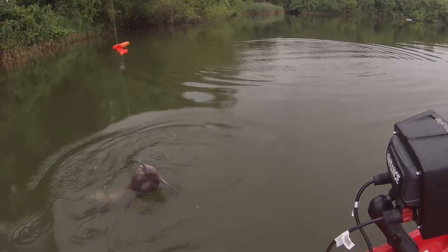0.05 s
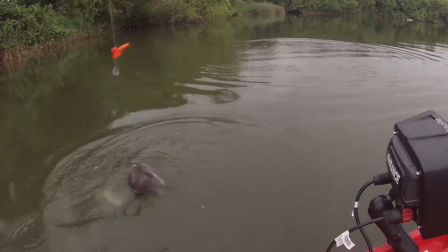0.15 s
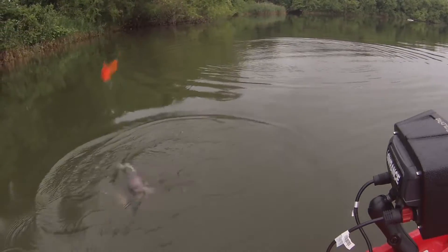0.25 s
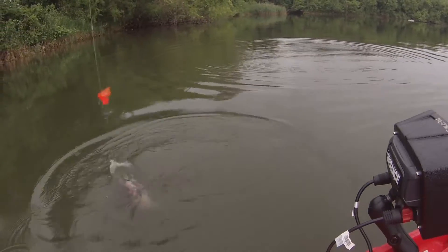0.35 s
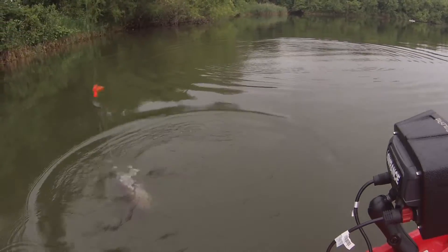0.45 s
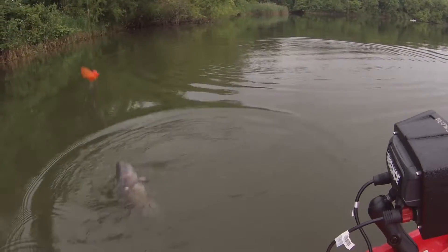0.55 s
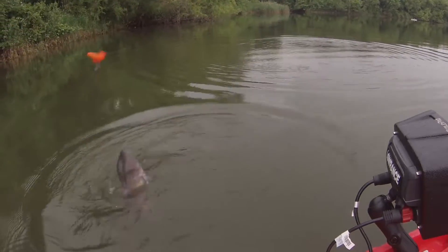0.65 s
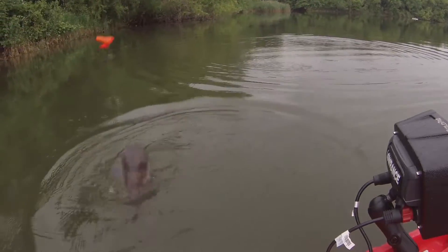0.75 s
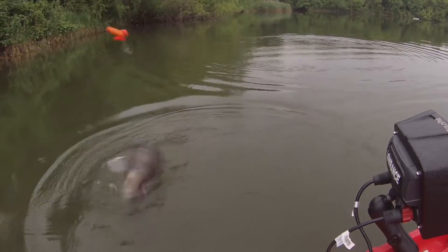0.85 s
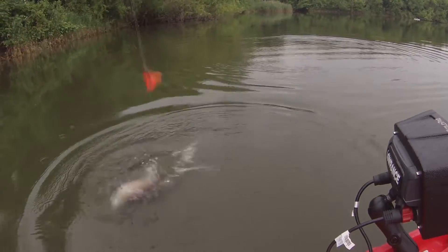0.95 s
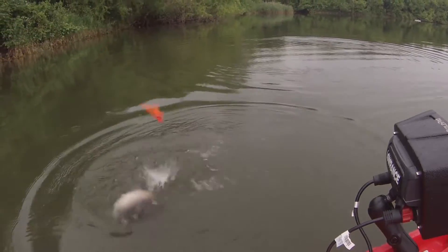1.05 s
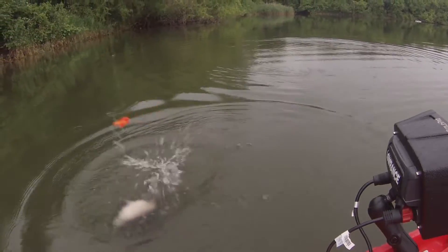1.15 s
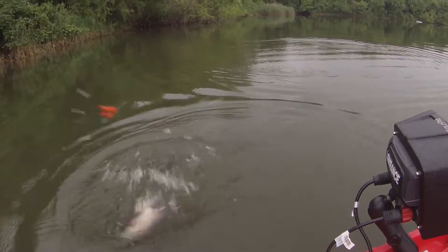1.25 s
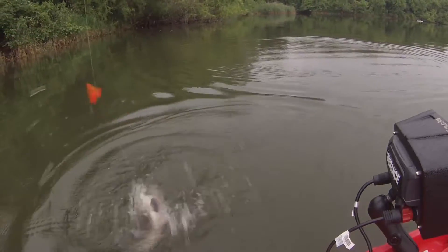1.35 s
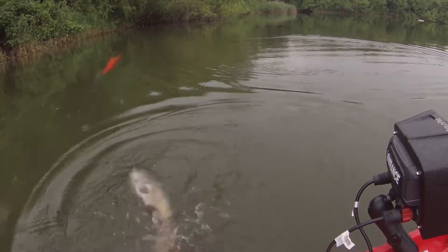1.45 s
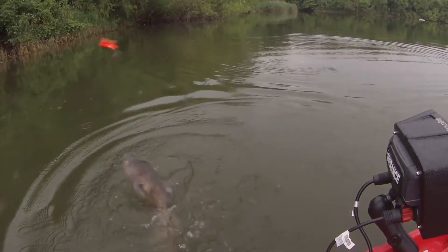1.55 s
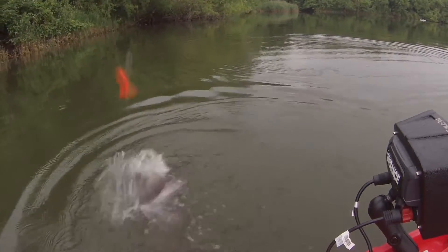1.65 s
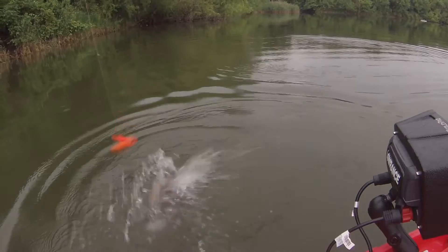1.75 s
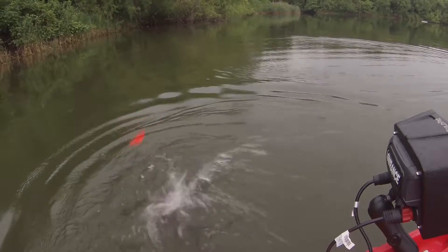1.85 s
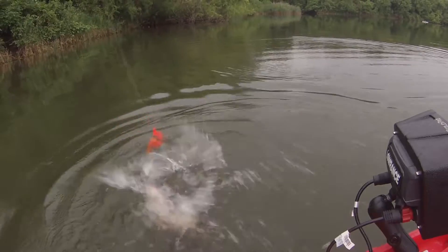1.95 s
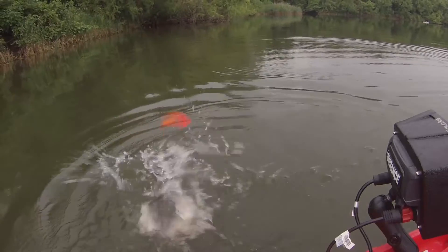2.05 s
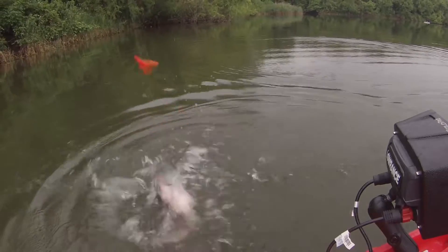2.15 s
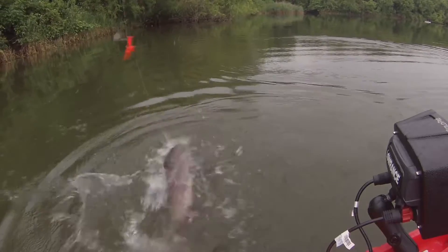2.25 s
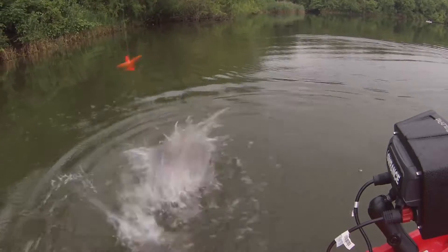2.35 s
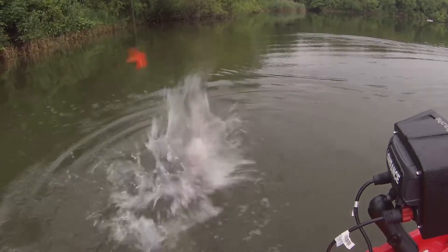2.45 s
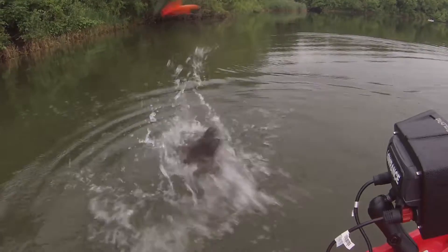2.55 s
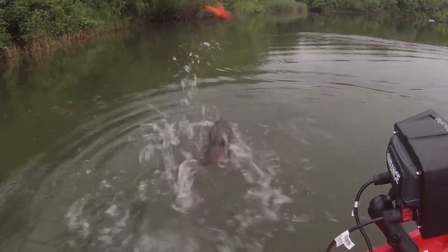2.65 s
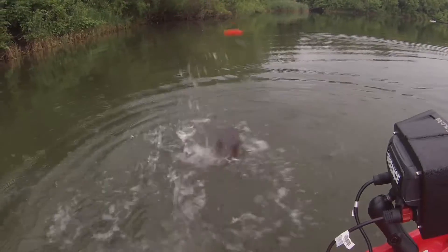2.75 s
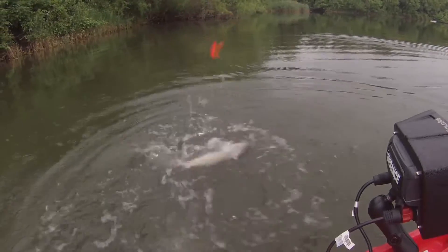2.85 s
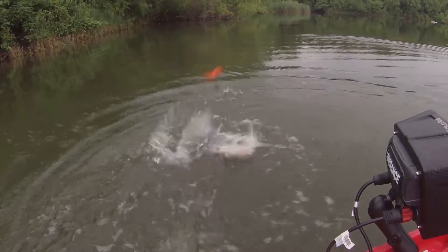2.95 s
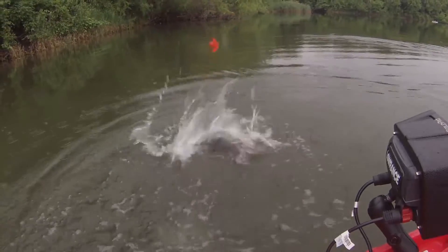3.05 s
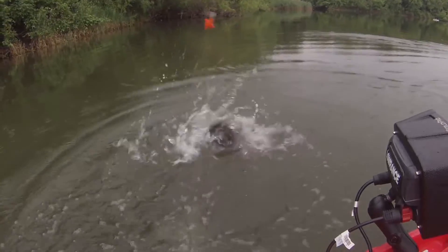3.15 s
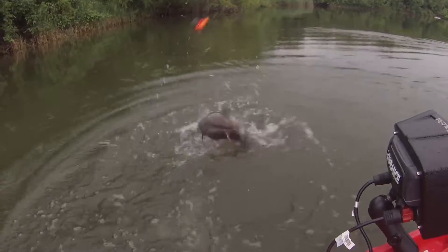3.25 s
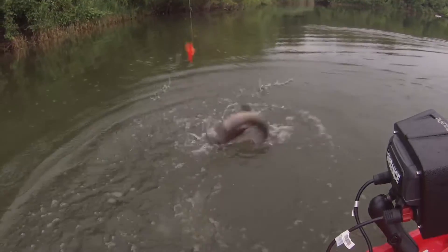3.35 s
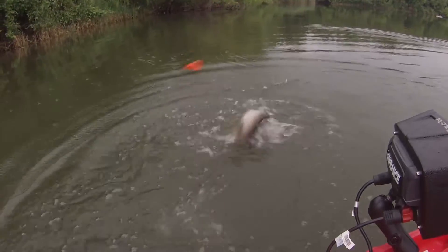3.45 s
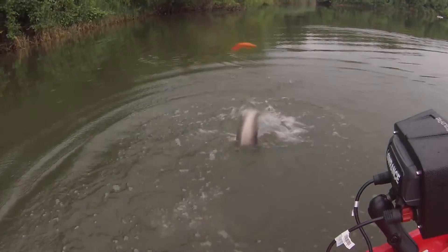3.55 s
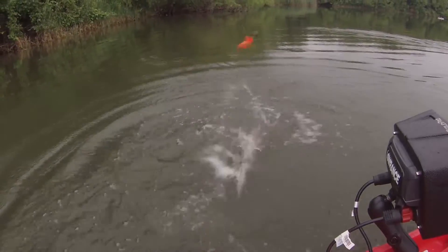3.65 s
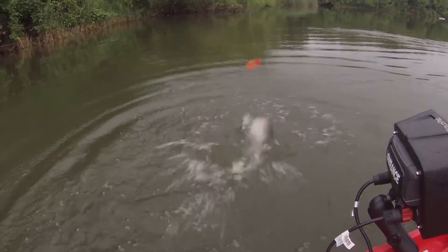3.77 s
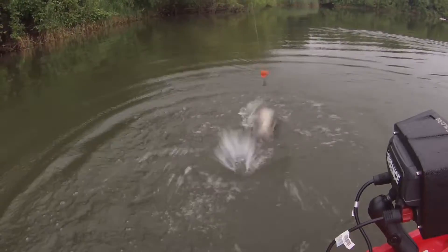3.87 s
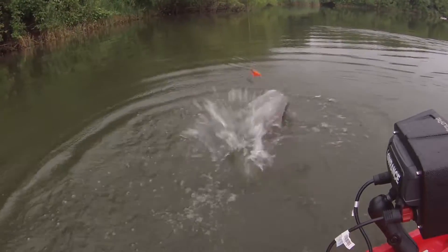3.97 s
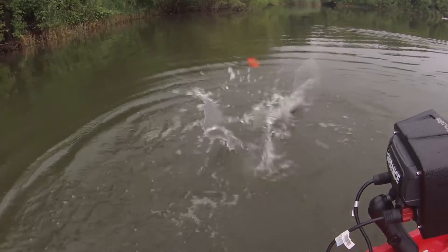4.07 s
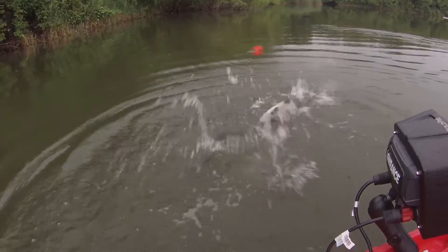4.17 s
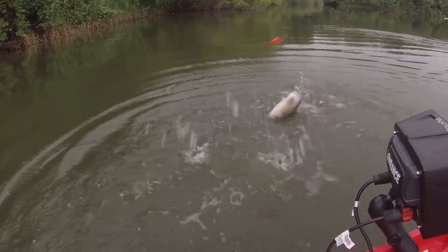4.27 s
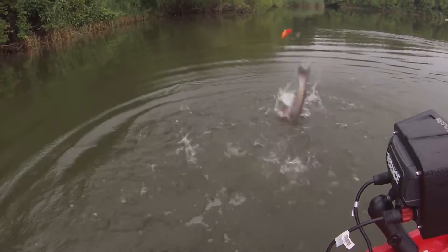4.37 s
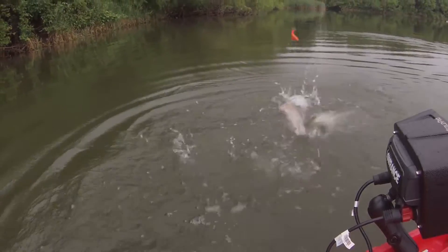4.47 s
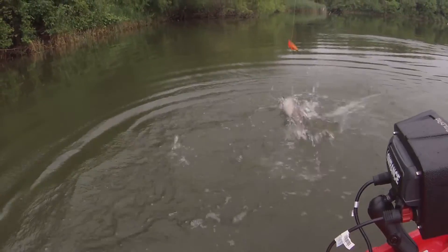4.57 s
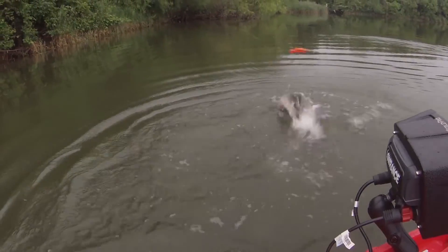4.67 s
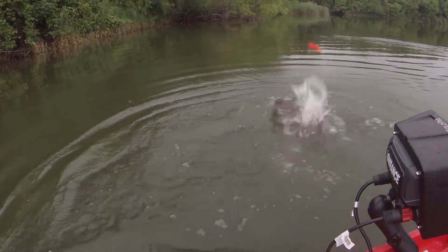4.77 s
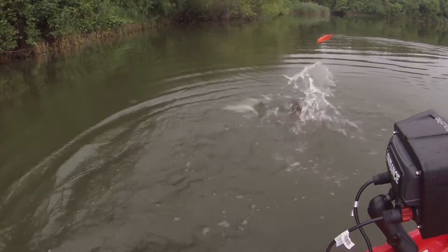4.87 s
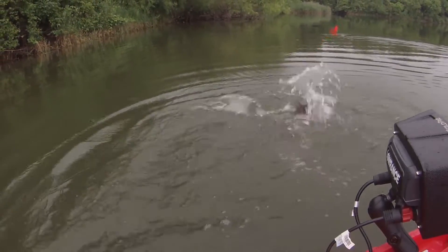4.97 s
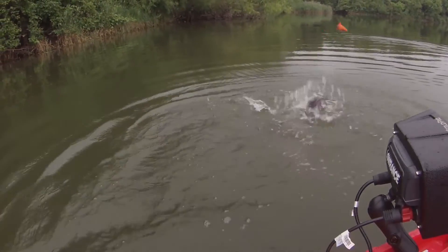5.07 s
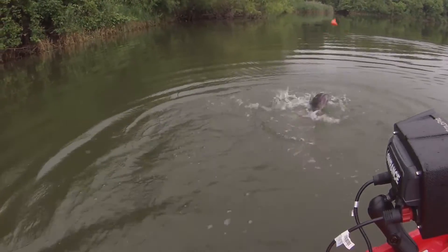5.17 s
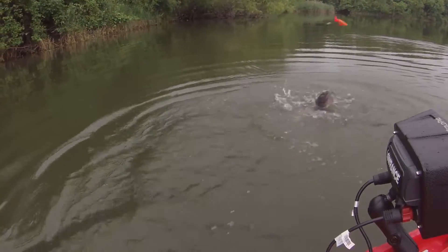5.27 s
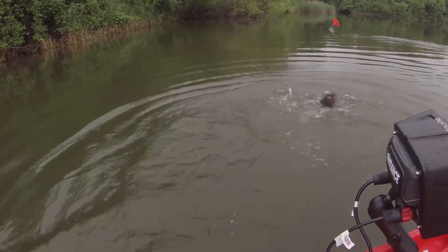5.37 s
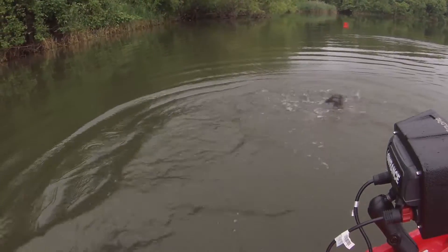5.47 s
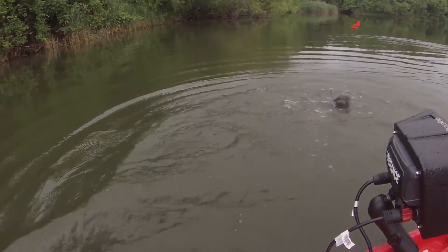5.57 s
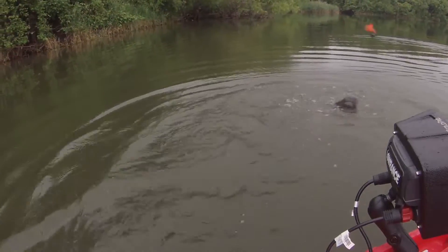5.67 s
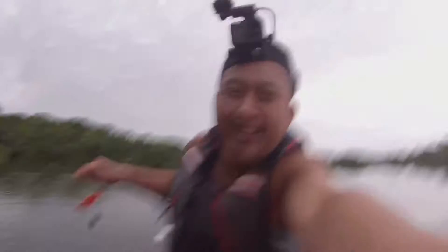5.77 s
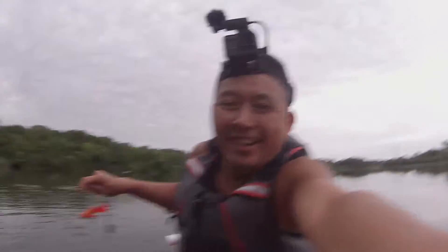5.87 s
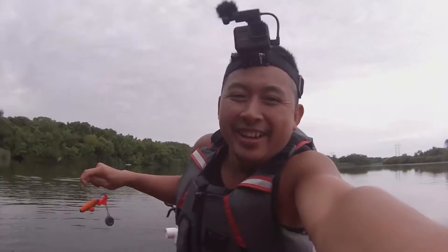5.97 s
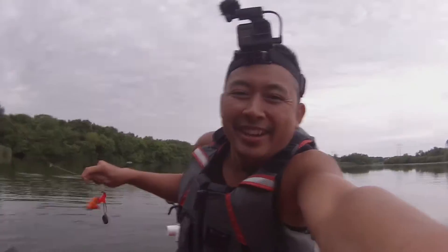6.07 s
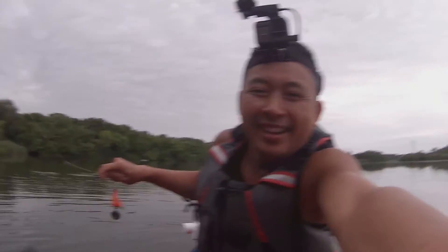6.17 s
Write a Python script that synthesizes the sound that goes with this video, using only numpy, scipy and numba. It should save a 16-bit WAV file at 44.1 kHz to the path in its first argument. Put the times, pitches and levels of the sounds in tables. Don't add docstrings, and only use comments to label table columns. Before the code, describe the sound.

Outdoors on a quiet lake, low wind presses on a close microphone as small birds chip and a few droplets patter. A hooked fish begins thrashing a few metres away: sprays, wet slaps, hollow gulps and gurgles, with thin metallic reel-drag ticks. The hardest slap comes late, then the water calms and a distant bird warbles in a freshening breeze.

```python
import sys
import numpy as np
from scipy import signal
from scipy.fft import rfft, irfft
from scipy.io import wavfile
from scipy.ndimage import uniform_filter1d
from numba import njit

SR = 44100
rng = np.random.default_rng(int(sys.argv[2]) if len(sys.argv) > 2 else 0)


def decibels_to_gain(level_db):
    exponent = np.asarray(level_db, float) / 20
    return 10 ** exponent


def to_wav(s):
    ch = np.atleast_2d(s).T
    pcm = np.round(np.clip(ch, -1, 1) * 32767)
    wavfile.write(sys.argv[1], SR, pcm.astype(np.int16))


N = 274302

# (time [s], level [dB])
GUSTS = [(0.0, -42.5), (0.12, -37), (0.4, -48), (0.55, -38), (1.78, -38.5), (2.16, -22.5), (2.29, -33),
         (3.19, -28), (3.34, -31.5), (4.61, -31), (5.02, -36), (5.96, -29), (6.22, -35.5)]
# (frequency [Hz], density [dB per Hz])
WIND_SPECTRUM = [(2, -6), (4, 9.5), (10, 3.5), (17, -12), (26, -11), (45, -22.5), (90, -50), (200, -38.5),
                 (400, -65.5)]
AIR_SPECTRUM = [(35, -25), (60, -11.5), (98, -13), (427, -26), (540, -28), (698, -33.5), (4420, -47),
                (12100, -49), (14900, -50.5), (16000, -83)]
WATER_SPECTRUM = [(150, -37), (250, 0), (427, 0), (470, -5.5), (619, -0.5), (884, -1.5), (1690, -6.5),
                  (2580, -6), (4260, -1), (5700, -8.5), (12000, -17), (15600, -44.5), (22000, -120)]
AIR_DB = -55
BREEZE_S, BREEZE_DB = 5.78, 2.5

# (time [s], length [s], start [Hz], middle [Hz], level [dB])
CHIPS = [
    (0.012, 0.027, 4150, 3400, -58),
    (.12, 0.078, 2040, 2280, -70),
    (0.307, 0.032, 3620, 3360, -56),
    (.47, 0.065, 1450, 1670, -68),
    (0.574, 0.034, 2150, 2440, -58),
    (0.624, 0.024, 3620, 3370, -57.5),
]
ARCHES = [
    (0.131, 0.093, 1500, 1736, -70),
    (0.262, 0.035, 2260, 2690, -59),
    (0.66, 0.12, 442, 406, -61.5),
]
WARBLE = [(5.41, .09, 5100, 5350, -70), (5.515, .075, 6700, 5400, -65), (5.59, .06, 4250, 4350, -68),
          (5.56, .08, 5400, 5350, -72), (5.83, .12, 5300, 5550, -71), (5.945, .062, 5850, 4800, -65),
          (6.0, .05, 4700, 4550, -71), (6.05, .055, 4200, 4800, -64), (6.1, .065, 5450, 5700, -65),
          (6.16, .035, 5950, 6600, -70)]

# (time [s], level [dB])
EFFORT = [(0.0, -68), (0.3, -58), (0.85, -60.5), (1.0, -45), (1.25, -57.5), (1.57, -54), (1.75, -49),
          (2.1, -41), (2.45, -37.5), (2.85, -56.5), (3.3, -42.5), (3.6, -46), (4.03, -49), (4.4, -47.5),
          (4.9, -44.5), (5.25, -53.5), (5.45, -59.5), (6.22, -66)]
GURGLE_UNDER_DB, DRAG_UNDER_DB = -5.5, -24
# (time [s], spray [dB], gurgle [dB], 10 dB fall [s])
STROKES = [(.04, -59, -55, 0.14), (.42, -50, -72.5, 0.09), (.53, -59, -74, 0.45), (.72, -60, -62, -0.06),
           (0.927, -37, -47, 0.01), (.98, -58, -58, -0.07), (1.052, -34.5, -42.5, 0.02),
           (1.319, -45, -62, -0.49), (1.381, -39, -71.5, 0.02), (1.49, -55.5, -60, 0.5),
           (1.687, -31, -42, 0.04), (1.818, -44, -51, 0.06), (1.971, -32.5, -55, 0.06),
           (2.05, -41, -35.5, -0.06), (2.209, -33.5, -27, -0.05), (2.361, -34.5, -35, 0.0641),
           (2.55, -36, -66, 0.17), (2.72, -36, -44.5, 0.11), (2.93, -34.5, -40.5, 0.13),
           (3.17, -38, -38, 0.0847), (3.45, -45, -47, 0.03), (3.69, -41, -46, 0.1),
           (3.838, -33, -35.5, 0.0577), (4.101, -45, -46, 0.06), (4.298, -33.5, -38.5, 0.1242),
           (4.47, -42.5, -41, 0.04), (4.661, -27, -26.5, 0.0263), (4.78, -39, -50, -0.01),
           (5.07, -39.5, -53, 0.1248), (5.149, -35, -43, 0.0364)]
STROKE_RISE = 0.83

# (time [s], peak [dB], pitch [Hz])
GULPS = [(.928, -38, 454), (1.027, -39, 450), (1.06, -43, 326), (2.775, -31.5, 390), (2.919, -31, 308),
         (3.09, -33, 340), (1.693, -25, 314), (1.782, -32, 603), (1.838, -30, 386), (2.029, -23.5, 400),
         (2.195, -20, 542), (2.263, -27, 420), (2.287, -20.5, 223), (2.318, -18, 457), (2.361, -27, 193),
         (2.361, -20, 377), (2.542, -23.5, 676), (2.857, -42, 286), (2.892, -25, 460), (3.007, -31, 583),
         (3.539, -20.5, 320), (3.643, -38, 339), (3.683, -26, 400), (3.811, -26, 640), (3.824, -22, 320),
         (3.839, -15, 428), (4.242, -33, 590), (4.771, -31, 550), (4.868, -38.5, 290), (5.143, -36, 580)]
BLIPS = [(0.385, -38.5, 787), (.426, -35, 2020), (.548, -48, 960), (.965, -40, 890), (1.0, -39, 720),
         (0.925, -36, 1300), (1.056, -28.5, 890), (1.65, -35, 720), (1.943, -31, 1320),
         (1.9751, -13.5, 523), (1.975, -10, 800), (2.155, -26, 1300), (2.232, -22.5, 857),
         (2.427, -31, 746), (2.62, -36, 1360), (2.943, -29, 923), (3.131, -34, 1120), (3.349, -31, 1360),
         (3.465, -32, 1165), (4.07, -30, 970), (4.107, -54.5, 1170), (4.268, -30, 800), (4.41, -29, 710),
         (4.468, -35, 870), (4.549, -30.5, 937), (4.798, -26, 880), (4.939, -29.5, 1110), (5.006, -36, 924),
         (5.073, -26.5, 920), (5.359, -42, 1020)]
DROPS = [(1.0315, -34, 1220), (1.072, -26, 2420), (1.6125, -37, 1540), (1.8407, -36, 1520),
         (2.1335, -35, 1400), (2.2238, -31, 1600), (2.32, -31, 2700), (2.405, -27, 2450),
         (2.4463, -31, 1850), (2.9012, -27, 1630), (2.961, -18, 1620), (3.0863, -42, 1790),
         (3.2036, -28, 1820), (3.2794, -39, 1260), (3.445, -36, 1200), (3.5438, -33, 1600),
         (3.672, -23, 1660), (3.8232, -23, 2380), (3.8324, -17, 1470), (3.8965, -41, 1130),
         (3.9654, -36, 1660), (3.9998, -37, 1650), (4.371, -32, 1710), (4.6506, -29, 1850),
         (5.019, -41, 1460), (5.0629, -25, 1460), (5.1547, -32, 1680), (5.3388, -43, 2100)]
CHATTER = [(2.364, -25, 870), (2.389, -28, 850), (2.719, -36, 995), (3.149, -40, 620), (3.192, -38, 677),
           (3.339, -38, 703), (3.39, -39, 910), (4.009, -37, 754), (4.029, -38, 800), (4.144, -51, 670),
           (4.176, -39, 940), (4.211, -32, 974), (4.359, -33, 790), (4.389, -39, 1000), (4.518, -36, 596),
           (4.697, -30, 920), (4.734, -37, 1020), (4.755, -29, 750), (4.862, -44.5, 880),
           (4.911, -36.5, 1020), (5.109, -36, 939), (5.131, -39, 590), (5.164, -35, 902), (5.251, -55, 577),
           (5.295, -47, 690)]
PLINKS = [(0.158, -52, 3860), (0.2199, -56, 3880), (0.444, -31.5, 4100), (0.5736, -45, 5050),
          (0.7262, -43, 4340), (3.7968, -32, 4250), (3.8434, -30, 4250), (3.8965, -31, 2890),
          (3.913, -29, 4800), (3.9858, -26, 4070), (4.1594, -25, 4940), (4.3497, -27, 4100),
          (4.979, -27, 4500), (5.4046, -45, 5110)]
PLOPS = [(0.866, -36, 121), (1.272, -33, 845), (2.04, -28.5, 394), (2.285, -27, 230), (2.321, -27.5, 154),
         (2.689, -38, 375), (2.691, -40, 184), (4.292, -23.5, 315), (4.645, -35, 477), (4.675, -28.5, 308),
         (4.811, -34, 464), (4.912, -46, 277), (5.305, -54, 478)]
GULP_T60_S, BLIP_T60_S, PLOP_T60_S = 0.036, 0.038, 0.12
DROP_T60_S, CHATTER_T60_S, PLINK_T60_S = 0.022, 0.041, 0.01
BURST_NEPER_PER_DB = .035
# (time [s], peak [dB], start [Hz], climb [octaves], ring [s])
RISERS = [(3.952, -41, 235, 1, .16), (3.845, -30.5, 330, 0.29, 0.097), (4.787, -36, 660, 2.3, .065),
          (1.283, -49, 900, 1.3, .05), (1.297, -54, 950, 1.1, .05), (3.6, -43, 390, 1.0, .11),
          (5, -37, 800, 1.0, .07), (5.14, -37, 500, 1.4, 0.081), (1.16, -51, 1150, 0.61, 0.073),
          (1.9, -39, 730, 0.46, .12), (0.26, -55, 1150, 1.1, .04), (1.2, -48, 1200, 0.25, .07),
          (0.6, -54.5, 720, .15, 0.16)]

# (time [s], level [dB], 10 dB fall [s])
SLIPS = [(.3, -65, 0.94), (.42, -54, 0.09), (.53, -45, 0.03), (.7, -56, 0), (0.927, -49, 0.1),
         (1.07, -45, 0.14), (1.239, -49.5, .025), (1.33, -47.5, .02), (1.46, -50, -0.14),
         (1.7, -52.5, 0.06), (1.83, -47.5, 0.25), (1.95, -39, 0.04), (2.089, -35.5, 0.01),
         (2.19, -32.5, -0.02), (2.24, -40.5, 0.08), (2.36, -53.5, -0.04), (2.55, -51.5, 0.6),
         (2.7, -48.5, -0.2), (2.99, -45.5, 0.06), (3.35, -52.5, .15), (3.69, -49, 0.2), (3.81, -57.5, 0.5),
         (3.95, -42.5, -0.03), (4.12, -50.5, -0.01), (4.31, -55.5, 0.03), (4.47, -54, 0.1),
         (4.66, -60.5, 0.86), (5.16, -59.5, 0.25), (5.54, -55, -0.4), (5.797, -45.5, -0.03)]
SLIP_RISE = 0.31
# (centre [Hz], width [Hz], level [dB])
REEL_PARTS = [(12520, 1200, -9.5), (7860, 2800, -8), (4260, 800, -3.5), (10420, 5100, -1),
              (13330, 900, -15)]

# (time [s], peak [dB], body below 2 kHz re peak [dB], brightest
# [Hz])
SLAPS = [(0.386, -25.5, -8, 4520), (0.4115, -30.5, -20, 2240), (0.9133, -27, -1.5, 3980),
         (1.059, -25, -2, 4900), (1.272, -31, -7.5, 4260), (1.3713, -31, -2, 4240),
         (1.4391, -28, -7.5, 4140), (1.6816, -17.5, -4.5, 4200), (1.8223, -27.5, -5, 4700),
         (1.939, -18.5, -7.5, 4250), (1.9785, -14, 5, 1540), (2.1565, -27, 1.5, 4030),
         (2.1879, -24.5, -5, 4260), (2.2922, -22.5, -4.5, 4500), (2.5446, -8.5, -5, 4110),
         (2.6294, -21.5, -15, 1900), (2.9173, -23.5, 4, 4340), (2.9452, -22.5, -1.5, 3700),
         (3.1567, -22.5, -9, 4070), (3.6441, -21, -2, 4150), (3.6835, -13.5, -1.5, 4150),
         (3.8232, -23, 0.5, 4200), (4.1101, -16, -1.5, 4300), (4.2802, -25, -8, 7100),
         (4.2966, -19, -1.5, 3760), (4.3919, -28, -9, 4040), (4.4712, -3, -4, 3390), (6.217, -39, 1, 3000),
         (4.6553, -15.5, -13, 5540), (5.064, -31.5, 5, 4260)]
# (time [s], peak [dB], brightest
# [Hz])
SPATTERS = [(0.53, -33, 4330), (1.3927, -30.5, 3540), (1.511, -25.5, 4530), (5.782, -36, 10900),
            (1.65, -20, 4600), (.302, -36, 1960), (1.9195, -35, 4250), (1.999, -18.5, 7700),
            (2.0252, -21, 3740), (2.0564, -25, 2420), (2.0838, -25, 4300), (2.2358, -17, 7660),
            (2.678, -24, 3340), (2.848, -19.5, 4180), (2.9719, -19, 3500), (3.256, -24, 2900),
            (3.3381, -31, 3170), (3.5573, -21.5, 3240), (3.7728, -24.5, 2600), (0.693, -36, 1800),
            (4.0854, -20.5, 4000), (4.099, -15.5, 3970), (4.1368, -21.5, 4590), (4.331, -20, 4300),
            (4.4448, -20, 4700), (4.548, -25.5, 4000), (4.594, -29.5, 4500), (4.778, -23.5, 3720),
            (5.073, -20, 4260), (5.3563, -28.5, 4120)]
SPATTER_BODY_DB, CRACK_S, CRACK_SPREAD = -37, .0025, .1

# (time [s], peak [dB], pitch [Hz])
TICKS = [(0.3861, -28.5, 8900), (0.4112, -26.5, 7630), (0.5163, -33, 13100), (0.8616, -40, 13200),
         (0.904, -41, 13200), (0.9119, -52, 7500), (0.9119, -37, 7830), (0.9414, -28, 12800),
         (1.0591, -29, 7930), (1.2295, -25, 13300), (1.3095, -31, 13200), (1.3814, -32, 8130),
         (1.4567, -31, 7820), (1.6463, -34, 8180), (1.6797, -28, 8350), (1.7411, -40, 8600),
         (1.757, -27, 12900), (1.8039, -27, 7800), (1.8214, -25, 8090), (1.9172, -41.5, 8500),
         (1.9391, -16.5, 8000), (1.9765, -25, 9320), (1.998, -20, 12900), (2.0848, -18, 13400),
         (2.16, -29, 8920), (2.1831, -29, 13000), (2.195, -27, 9800), (2.2386, -14, 13200),
         (2.2918, -23.5, 7810), (2.3345, -18, 12700), (2.541, -18.5, 9100), (2.7, -24, 13300),
         (2.9488, -28, 13200), (2.9892, -31, 8590), (3.0586, -26, 13100), (3.0955, -33, 11300),
         (3.1229, -36, 13400), (3.1748, -32, 7750), (3.3384, -28, 8100), (3.517, -36, 8180),
         (3.645, -28, 8400), (3.6702, -32, 7500), (3.6854, -17.5, 8340), (3.748, -31, 7990),
         (3.8233, -27, 8160), (4.1082, -17, 9100), (4.2803, -28, 9340), (4.3002, -24, 7700),
         (4.3721, -28, 9220), (4.4449, -34, 10300), (4.4714, -10.5, 8000), (4.638, -31, 8160),
         (4.6554, -28, 8100), (5.066, -27.5, 7900), (5.5075, -42, 7740), (5.7824, -28, 13000)]
TICK_S, TICK_FOCUS_DB = 0.0019, 0

TOP_HZ = 15300


def level(x, db):
    return x * decibels_to_gain(db) / np.sqrt(np.mean(x ** 2))


def curve(table):
    time_s, db = np.transpose(table)
    return np.interp(np.arange(N) / SR, time_s, db)


def colour(x, spectrum):
    hz = np.maximum(np.fft.rfftfreq(N, 1 / SR), 1)
    point_hz, point_db = np.transpose(spectrum)
    gain = decibels_to_gain(np.interp(np.log(hz), np.log(point_hz), point_db))
    return irfft(rfft(x) * gain, N)


def band(x, lo_hz, hi_hz):
    edges_hz = [lo_hz, min(hi_hz, .45 * SR)]
    return signal.sosfilt(signal.butter(2, edges_hz, "bandpass", fs=SR, output="sos"), x)


def walk(rate_hz):
    hold = int(SR / rate_hz)
    steps = np.repeat(rng.standard_normal(N // hold + 1), hold)
    return 1.7 * uniform_filter1d(steps, hold)[:N]


def swells(s, peak_db, fall_s, rise, steady_db):
    power, t = decibels_to_gain(2 * steady_db), np.arange(N) / SR
    for at, db, fall in zip(s, peak_db, np.maximum(fall_s, .005)):
        drop_db = 10 * np.maximum((t - at) / fall, (at - t) / (rise * fall))
        power = power + decibels_to_gain(2 * (db - drop_db))
    return np.sqrt(power)


def air():
    wind = level(colour(rng.standard_normal(N), WIND_SPECTRUM), 3.07)
    hiss = level(colour(rng.standard_normal(N), AIR_SPECTRUM), AIR_DB)
    freshening = np.clip((np.arange(N) / SR - BREEZE_S) / .15, 0, 1)
    return decibels_to_gain(curve(GUSTS)) * wind + decibels_to_gain(1.3 * walk(2.9) + BREEZE_DB * freshening) * hiss


def birds(notes, carry, wobble, flicker_db, echo_db, echo_s):
    out, waver = np.zeros(N + SR), np.tile(walk(200), 2)
    for s, length_s, start_hz, middle_hz, db in notes:
        end_hz = middle_hz + carry * (middle_hz - start_hz)
        first = int(s * SR)
        u = np.arange(int(length_s * SR)) / (length_s * SR)
        span = slice(first, first + len(u))
        hz = start_hz * (1 - u) * (1 - 2 * u) + middle_hz * 4 * u * (1 - u) + end_hz * u * (2 * u - 1)
        hz = hz * (1 + wobble * waver[span])
        tone = np.sin(2 * np.pi * np.cumsum(hz) / SR)
        out[span] += decibels_to_gain(db + 7.5) * np.sqrt(np.sin(np.pi * u)) * tone
    t = np.arange(12000) / SR
    echoes = decibels_to_gain(echo_db) * rng.standard_normal(len(t)) * np.exp(-t / echo_s)
    return out[:N] * decibels_to_gain(flicker_db * walk(90)) + signal.fftconvolve(out, echoes)[:N]


@njit
def ring(start_s, hz, t60_s, rise_oct, size, swell):
    out = np.zeros(N)
    for g in range(len(start_s)):
        first, length = int(start_s[g] * SR), int(t60_s[g] * SR) + 2
        fade = np.exp(-np.log(1000) / length)
        glide = 2 ** (2 * rise_oct[g] / length)
        step, phase, a = 2 * np.pi * hz[g] / SR, 0., size[g]
        for i in range(first, min(first + length, N)):
            out[i] += a * np.sin(phase) * min((i - first + 1) / (swell * length), 1.)
            phase += step
            step = min(step * glide, 3.)
            a *= fade
    return out


def shower(count, lo_hz, hi_hz, cycles, rise_oct, scatter_db, patchy_db):
    when, pitch, life, luck = rng.random((count, 4)).T
    hz = lo_hz * (hi_hz / lo_hz) ** pitch
    size = hz * decibels_to_gain(-scatter_db * np.log(luck + 4e-3))
    t60_s = cycles * (0.49 + 1.42 * life) / hz
    return decibels_to_gain(patchy_db * walk(45)) * ring(when * N / SR, hz, t60_s, rise_oct * life, size, 0.062)


def churn():
    fizz = shower(count=30000, lo_hz=1280, hi_hz=12900, cycles=7.4, rise_oct=0.16, scatter_db=1.5, patchy_db=2.0)
    patter = shower(count=3000, lo_hz=1500, hi_hz=9000, cycles=5, rise_oct=.1, scatter_db=3.1, patchy_db=2.5)
    gurgle = shower(count=3400, lo_hz=400, hi_hz=2300, cycles=24, rise_oct=.9, scatter_db=1.5, patchy_db=2.5)
    spray = level(colour(fizz, WATER_SPECTRUM), -4.0) + level(colour(patter, WATER_SPECTRUM), -5)
    gurgle = level(colour(gurgle, WATER_SPECTRUM), -0.26)
    s, spray_db, gurgle_db, fall_s = np.transpose(STROKES)
    effort_db = curve(EFFORT)
    thrown = swells(s, spray_db, fall_s, STROKE_RISE, effort_db)
    trapped = swells(s, gurgle_db, fall_s, STROKE_RISE, effort_db + GURGLE_UNDER_DB)
    return thrown * spray + trapped * gurgle


def gulps():
    groups = [GULPS, BLIPS, DROPS, CHATTER, PLINKS, PLOPS]
    rings_s = [GULP_T60_S, BLIP_T60_S, DROP_T60_S, CHATTER_T60_S, PLINK_T60_S, PLOP_T60_S]
    s, peak_db, hz = np.transpose(sum(groups, []))
    t60_s = np.repeat(rings_s, [len(g) for g in groups])
    t60_s = np.clip(t60_s * np.exp(-BURST_NEPER_PER_DB * (peak_db + 31.5)), .005, .3)
    rows = np.array([s, .94 * hz, t60_s, np.full(len(s), 0.26), decibels_to_gain(peak_db + 1.5)])
    bubbles = ring(*rows[:, :-len(PLOPS)].copy(), 0.097)
    plops = ring(*rows[:, -len(PLOPS):].copy(), 0.041)
    at_s, db, start_hz, climb_oct, ring_s = np.transpose(RISERS)
    risers = ring(at_s, start_hz, ring_s, climb_oct, decibels_to_gain(db + 10), 0.33)
    return decibels_to_gain(2.25 * walk(260)) * (bubbles + plops + risers)


def reel():
    pull = swells(*np.transpose(SLIPS), SLIP_RISE, curve(EFFORT) + DRAG_UNDER_DB)
    pull_db = 20 * np.log10(pull)
    gap, luck, draw, *mix = rng.random((4000, 3 + len(REEL_PARTS))).T
    at = np.minimum((np.cumsum(.002 + .007 * gap ** 2) * SR).astype(int), N - 1)
    chance = np.clip((pull_db[at] + 75) / 22, .04, 1)
    size = (draw < chance) * decibels_to_gain(-3 * np.log(luck + .03)) / chance ** .3
    rattle, body = rng.standard_normal(N), 0
    for (hz, width_hz, db), share in zip(REEL_PARTS, mix):
        hits = np.zeros(N)
        hits[at] = size * decibels_to_gain(db + 21 * share)
        scrape = rattle * signal.lfilter([1], [1, -np.exp(-1 / (0.0023 * SR))], hits)
        part = band(scrape, hz - width_hz / 2, hz + width_hz / 2)
        body = body + part * np.sqrt(1000 / width_hz)
    return pull * level(body, 2.2)


def slaps():
    rows = SLAPS + [(s, db, SPATTER_BODY_DB, hz) for s, db, hz in SPATTERS]
    s, peak_db, body_db, bright_hz = np.transpose(rows)[:, :, None]
    decay_s = np.clip(CRACK_S * np.exp(CRACK_SPREAD * rng.standard_normal(s.shape)), .0004, .03)
    t = np.arange(3000) / SR
    swell = (1 - np.exp(-t / (.6 * decay_s))) ** 2
    fall = np.exp(-t / decay_s) + decibels_to_gain(-30.0) * np.exp(-t / (5 * decay_s))
    crack = swell * fall * rng.standard_normal((len(s), len(t)))
    crack[np.arange(len(s)), (.7 * decay_s[:, 0] * SR).astype(int)] -= 2.5
    focus = np.array([band(c, 0.77 * hz, 1.184 * hz) for c, hz in zip(crack, bright_hz[:, 0])])
    parts = [band(crack, 110, 500), band(crack, 800, 2300), band(crack, 2000, 6000),
             band(crack, 6000, 12000), focus]
    thump, body, middle, top, focus = (p / np.abs(p).max(axis=1, keepdims=True) for p in parts)
    middle_db = -12.5 + .5 * np.clip(body_db + 18, -8, 8)
    bright = decibels_to_gain(-2.5) * focus + decibels_to_gain(middle_db) * middle + decibels_to_gain(-25.5) * top
    burst = decibels_to_gain(peak_db + 1.5) * (decibels_to_gain(body_db) * (body + decibels_to_gain(-16) * thump) + bright)
    out = np.zeros(N + len(t))
    np.add.at(out, ((s - .5 * decay_s) * SR).astype(int) + np.arange(len(t)), burst)
    return out[:N]


def ticks():
    s, peak_db, hz = np.transpose(TICKS)
    t = np.arange(600) / SR
    envelope = np.exp(-t / TICK_S) * (1 - np.exp(-t / 0.0002))
    scrape = rng.standard_normal((len(s), len(t))) * envelope
    focus = np.array([band(c, .88 * f, 1.12 * f) for c, f in zip(scrape, hz)])
    click = band(scrape, 5700, 14300) + decibels_to_gain(TICK_FOCUS_DB) * 2 * focus
    click = decibels_to_gain(peak_db - 3.0)[:, None] * click / np.abs(click).max(axis=1, keepdims=True)
    out = np.zeros(N + len(t))
    np.add.at(out, (s[:, None] * SR).astype(int) + np.arange(len(t)), click)
    return out[:N]


def scene():
    near = dict(wobble=.012, flicker_db=1.5, echo_db=-38, echo_s=.03)
    bank = birds(CHIPS, carry=.3, **near) + birds(ARCHES, carry=-1, **near)
    far = decibels_to_gain(-5) * birds(WARBLE, carry=.95, wobble=.02, flicker_db=4, echo_db=-31, echo_s=.04)
    return (air() + bank + far + churn() + gulps() + reel() + slaps() + ticks())[None]


def top_cut(x):
    return signal.sosfilt(signal.butter(12, 16370, fs=SR, output="sos"), x)


def record(dry):
    cut = signal.sosfilt(signal.ellip(7, .3, 42, TOP_HZ, fs=SR, output="sos"), dry)
    mix = np.clip(cut, -1, 1)
    return top_cut(mix)


dry = scene()
out = record(dry)
to_wav(out)
```